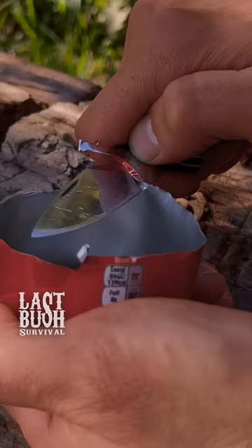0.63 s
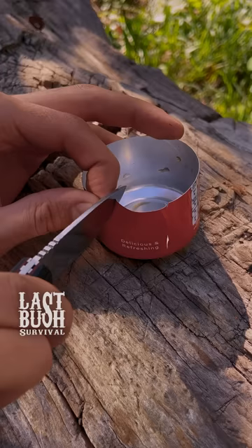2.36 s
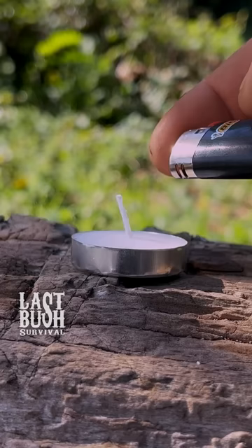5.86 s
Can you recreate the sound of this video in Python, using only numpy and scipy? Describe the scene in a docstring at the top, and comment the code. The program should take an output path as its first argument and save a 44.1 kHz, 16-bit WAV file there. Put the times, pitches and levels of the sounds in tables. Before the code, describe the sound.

A knife saws through a thin aluminium can in short, crackly scrapes and sharp snaps, then the metal knocks twice on wood.

```python
"""A knife cuts round a thin aluminium can on a log outdoors, close to a stereo microphone.
The blade sticks and slips through the wall in short strokes, and the buckling sheet snaps.
At the end the blade clinks free, the cut cup knocks twice on the wood and something slides over it.
Five short scenes, each with its own wind, far rumble and hiss; a faint low tick leads into the last."""
import sys
import numpy as np
from scipy import signal
from scipy.fft import rfft, irfft
from scipy.io import wavfile
from scipy.ndimage import uniform_filter1d

SR = 44100
rng = np.random.default_rng(int(sys.argv[2]) if len(sys.argv) > 2 else 0)


def generate_wav(sig):
    """Save sig (samples, or channels by samples) to the path in sys.argv[1] as 16-bit PCM at SR."""
    pcm = np.round(np.clip(np.atleast_2d(sig).T, -1, 1) * 32767).astype(np.int16)
    wavfile.write(sys.argv[1], SR, pcm)


N = 269892
SIZE = 4096  # samples in one response of the metal
HZ = np.fft.rfftfreq(SIZE, 1 / SR)
# bounds of the five scenes: (time [s])
SCENES = [0, .678, 2.435, 5.145, 5.91, 6.2]
# modes of the cup's base: (frequency [Hz], level [dB], t60 [s])
CUP_MODES = [(212, -32.5, 0.17), (681, -19, 0.063), (1369, -21.5, 0.15), (1530, -19, 0.14),
             (3670, -21, 0.027)]


def cutting():
    """Stick and slip: the edge bites, then uneven slips and a fine rub swell to each stroke's crest."""
    # let go by the blade, the can rings on: (frequency [Hz], level over the stroke [dB], t60 [s])
    after_ring = [(2680, -18, 0.14), (4360, -26, .09)]
    # slow judder in stiff wall, a fine run where the blade cuts freely: (time [s], slip rate [1/s])
    slip_rates = [(.4, 860), (.7, 300), (1.17, 137), (1.85, 100), (2.02, 513), (2.21, 176), (2.45, 1100),
                  (3.6, 890), (4.07, 250)]
    out = np.zeros((2, N))
    for start, length, rise, db, bright in strokes():
        crest, end = start + rise * length, start + length
        t = np.arange(start, end, 1 / SR)
        rub = friction(len(t), rate=np.interp(start, *np.transpose(slip_rates)))
        push = gain_of(-12 * np.interp(t, [start, crest, end], [1, 0, 1]) ** 1.5)
        bite = 0.5 * np.exp((start - t) / 0.0023 + (start - crest) / 0.043)  # quick strokes bite hardest
        knots = np.arange(start, end, .004)
        catch = gain_of(1.5 * np.interp(t, knots, rng.standard_normal(len(knots))))
        drive = unit_rms((push + bite) * catch * rub) * np.sqrt(np.mean(push ** 2))
        response = wall(start, bright, tail_db=-4, t60=0.019)
        add(out, start, gain_of(db) * signal.fftconvolve(response, drive[None], axes=1))
        if start > SCENES[2]:
            add(out, end, gain_of(db) * ring(after_ring))
    return out


def strokes():
    """The blade's moves: (start [s], length [s], share spent rising, level [dB], tilt [dB/octave])."""
    # the hand leans in until the metal gives: (start [s], length [s], level [dB], tilt [dB/octave])
    pushes = [(.048, 0.032, -37.5, -1.5), (0.997, 0.067, -48, -0.5), (1.3, .07, -55, .5),
              (1.437, 0.081, -47.5, 6.5), (1.85, 0.12, -52, 0.5), (2.024, 0.065, -42, 2),
              (2.21, 0.19, -47.5, 1), (2.439, 0.11, -42.5, -2), (2.536, 0.13, -42.5, -2),
              (2.82, 0.11, -36, 0), (3.199, 0.058, -43.5, -2.5), (3.306, 0.081, -45, -2.5),
              (3.466, 0.055, -43.5, -4), (3.591, 0.084, -35, 0), (3.978, 0.072, -52.5, -2),
              (4.068, 0.068, -47, -1.5), (4.509, 0.099, -51, -3), (4.695, 0.035, -49, -1)]
    # the edge rips, then may coast on: (start [s], rip [s], coast [s], level [dB], tilt [dB/octave])
    rips = [(.207, 0.011, 0, -32.5, -.5), (.258, .04, 0, -40, 0.5), (.484, .03, 0.0049, -45.5, -5),
            (.695, 0.058, 0.15, -46, -.5), (1.167, 0.077, 0.0023, -47, 0), (1.598, .022, 0.069, -35.5, 2.5),
            (2.93, 0.016, 0.076, -37, -1), (3.864, .048, 0.059, -35, -2), (4.355, 0.056, 0, -43, 0),
            (4.943, 0.023, 0.039, -41, -7.5)]
    push_rise, rip_rise, coast_rise, coast_db = .63, .25, .3, -52
    moves = [(start, length, push_rise, db, bright) for start, length, db, bright in pushes]
    for start, length, coast, db, bright in rips:
        moves.append((start, length, rip_rise, db, bright))
        if coast > 0:
            moves.append((start + length, coast, coast_rise, coast_db, 0))
    return moves


def friction(size, rate):
    """Force at the edge: uneven slips, about `rate` a second, each in a skid of noise, over a fine rub."""
    waits = rng.gamma(2, 1 / 2, 600)
    kicks = gain_of(3 * np.clip(rng.standard_normal(len(waits)), -2, 2))
    kicks *= rng.choice([-1, 1], len(waits))
    at = ((np.cumsum(waits) - waits[0]) * SR / rate).astype(int)
    slips = np.zeros(size)
    slips[at[at < size]] = kicks[at < size]
    skid_shape = signal.windows.hann(round(.8 * SR / rate)) ** 2  # slow slips skid longer
    skid = signal.fftconvolve(abs(slips), skid_shape, "same") * rng.standard_normal(size)
    return .6 * unit_rms(slips) + unit_rms(skid) + 0.27 * rng.standard_normal(size)


def wall(s, bright, tail_db, t60, bass_db=0):
    """The can's answer to one slip at time s; its resonances shift with the grip and the cut's length."""
    # the wall pierced by the point, sawn, and with its rim cut loose: (frequency [Hz], level [dB])
    pierced = [(300, -44), (1200, -17), (4200, -11), (6000, -4.5), (7600, 3), (9500, -0.5), (11000, 1.5),
               (15000, -12)]
    sawn = [(800, -13), (1200, -19.5), (1950, -5), (2700, 4), (3600, -13), (5400, -22), (7000, -16),
            (8100, -24), (11300, -14), (14500, -15), (16000, -21)]
    loose = [(60, -36), (300, -16.5), (1100, -17), (1650, -7.5), (1950, -15), (2700, -.5), (3350, 1.5),
             (3950, -10.5), (5450, -12), (6100, -19), (6950, -7.5), (8200, -16), (9800, -18.5),
             (10700, -11.5), (12300, -13), (13700, -4.5), (16000, -17.5)]
    # late in the cut the wall goes slack and its resonances blur: (time [s], slack [0-1])
    slackness = [(3.7, 0), (4.35, .6), (4.85, .05)]
    # the freed strip flaps with a resonance of its own: (time [s], boost [dB])
    flap = [(3.7, 1.5), (4.35, 9), (4.85, -0.5), (4.95, 12)]
    # the cut rim sings under the blade: (frequency [Hz], level [dB], t60 [s])
    rim_modes = [(3317, -26.5, 0.04), (3690, -31, 0.065), (6820, -30, 0.043)]
    stiffness = 1 + .02 * rng.uniform(-1, 1)  # the grip detunes the resonances
    colour = read_curve(pierced if s < SCENES[1] else sawn if s < SCENES[2] else loose, HZ / stiffness)
    slack = np.interp(s, *np.transpose(slackness))
    colour = (1 - slack) * colour + slack * uniform_filter1d(colour, size=200)
    ripple = uniform_filter1d(rng.standard_normal(len(HZ)), 36)
    grip_db = 1.7 * unit_rms(uniform_filter1d(ripple, 24))
    tilt_db = bright * np.log2(np.maximum(HZ, 1500) / 4000)
    shelf_db = bass_db / (1 + (HZ / 1300) ** 6)
    flap_db = np.interp(s, *np.transpose(flap)) * np.exp(-((HZ - 1950) / 300) ** 2)
    pulse = bending_wave(colour + grip_db + tilt_db + shelf_db + flap_db, lag_s=.0007)
    if s > SCENES[2]:
        rim = ring([(hz * stiffness, db, decay) for hz, db, decay in rim_modes], size=SIZE)
        pulse = pulse + (1 - slack) * abs(pulse).max() * rim
    return shimmer(pulse, tail_db, t60, width=.6 if s < SCENES[2] else .2)


def bending_wave(colour_db, lag_s):
    """In thin sheet the treble outruns the bass, so a click becomes a tiny chirp."""
    slowness = np.sqrt(3000 / (HZ + 500))
    delay = lag_s * (slowness - slowness[-1])
    phase = 2 * np.pi * np.cumsum(delay) * HZ[1]
    chirp = irfft(rfft(click(colour_db)) * np.exp(-1j * phase))
    return chirp * (np.arange(SIZE) < SIZE / 2)


def shimmer(pulse, tail_db, t60, width):
    """Adds the crowd of short-lived modes of thin sheet, a little different left and right."""
    t = np.arange(SIZE) / SR
    mid, side = rng.standard_normal((2, SIZE)) * gain_of(-60 * t / t60) * (1 - np.exp(-t / 0.0009))
    tail = gain_of(tail_db) * (mid + width * side * np.array([[1], [-1]])) / np.linalg.norm(mid)
    tail[:, 0] = 1  # the direct pulse
    return signal.fftconvolve(tail, pulse[None], axes=1)[:, :SIZE]


def snaps():
    """The sheet creaks under strain, then gives at once; the bigger the buckle, the thinner its bass."""
    # the sheet buckles or tears: (time [s], relative level [dB])
    buckles = [(0.2001, -25.5), (0.3216, -21), (.474, -24.5), (0.4843, -23.5), (0.5256, -29), (1.1687, -37),
               (1.5962, -24.5), (1.6119, -21), (1.8765, -28), (1.891, -31), (1.925, -26.5), (2.0601, -28.5),
               (2.0771, -22), (2.174, -39), (2.359, -19.5), (2.4853, -27), (2.4977, -24), (2.524, -26.5),
               (2.705, -31.5), (2.742, -31), (2.765, -28.5), (2.8865, -15), (2.8897, -18.5), (2.9024, -16),
               (2.9084, -16.5), (2.928, -16), (3.074, -33), (3.3484, -27), (3.3934, -29), (3.4193, -29.5),
               (3.4802, -28), (3.5361, -31), (3.6702, -23), (4.0717, -29), (4.108, -28), (4.1298, -32),
               (4.1402, -20), (4.3555, -29), (4.383, -28), (4.7827, -27), (4.8032, -25), (4.8175, -27.5),
               (4.8403, -23.5), (4.8537, -10), (4.9426, -28.5), (4.957, -20)]
    out = np.zeros((2, N))
    for s, db in buckles:
        response = wall(s, bright=-.6, tail_db=-12, t60=0.026, bass_db=-.7 * (db + 30.5))
        add(out, s - SIZE / 8 / SR + 0.00074, gain_of(db + 10) * scuffed_blow(response))
    return out


def scuffed_blow(response):
    """A blow SIZE / 8 samples in, with a short scuff that builds up to it and dies after it."""
    t = np.arange(-SIZE // 8, SIZE // 8) / SR
    envelope = 0.25 * np.exp(-abs(t) / 0.00043) + 0.023 * np.exp(-abs(t) / 0.0032)
    force = envelope * rng.standard_normal(len(t)) + (t == 0)
    sound = signal.fftconvolve(response, force[None], axes=1)
    return sound / np.linalg.norm(sound[0])


def clinks():
    """The blade flicks off the edge and rings briefly with a tinny rattle."""
    # flicks of the blade: (time [s], relative level [dB])
    flicks = [(5.1023, -37.5), (5.1112, -35.5), (4.182, -55.5)]
    # the blade's modes: (frequency [Hz], level [dB], t60 [s])
    blade_modes = [(2710, -14.5, .11), (3740, -8, 0.068), (5943, -8, 0.036), (7100, -8, 0.066),
                   (8100, 4.5, 0.035), (11200, 2, 0.03), (13500, -1, .02)]
    out = np.zeros((2, N))
    for s, db in flicks:
        add(out, s, gain_of(db - 2.5) * ring(blade_modes, size=SIZE))
        add(out, s, gain_of(db + 5.5) * wall(s, bright=4, tail_db=15.5, t60=0.03))
    return out


def knocks_and_tick():
    """The cup knocks twice on the wood, rim cracking, base ringing; a low tick marks the scene change."""
    # two knocks, then the faint tick: (time [s], ring level [dB], crack level [dB])
    hits = [(5.326, -38, -24), (5.4122, -15.5, 1.5), (5.904, -40, -45)]
    # spectrum of the crack: (frequency [Hz], level [dB])
    crack_colour = [(400, -40.5), (1200, -11.5), (2200, -3), (3700, 2.5), (5000, -13), (7200, -8.5),
                    (8900, -2), (10900, 4), (12800, -18), (16000, -26)]
    out = np.zeros((2, N))
    for s, ring_db, crack_db in hits:
        crack = shimmer(click(read_curve(crack_colour, HZ)), tail_db=-4.5, t60=0.019, width=0.22)
        add(out, s - SIZE / 8 / SR, gain_of(crack_db) * scuffed_blow(crack))
        add(out, s, gain_of(ring_db) * ring(CUP_MODES))
    return out


def slide():
    """Something slides lightly over the metal: a fluttering friction hiss that swells and fades."""
    # spectrum of the friction: (frequency [Hz], level [dB])
    hiss_colour = [(4000, -16), (7000, -2.5), (10000, 3.5)]
    start_s, end_s, level_db = 5.57, 5.88, -58
    colour_db = read_curve(hiss_colour, np.fft.rfftfreq(N, 1 / SR))
    hiss = irfft(rfft(rng.standard_normal(N)) * gain_of(colour_db), N)
    flutter_db = 3.2 * wander(size=200)
    swell = np.sin(np.interp(np.arange(N) / SR, [start_s, end_s], [0, np.pi]))
    return unit_rms(hiss) * gain_of(level_db + flutter_db) * swell


def fingers():
    """Fingertips shift on the cut cup and faintly stir its base."""
    t = np.arange(N) / SR
    rub = signal.fftconvolve(rng.standard_normal(N), ring(CUP_MODES[2:4], size=250))[:N]
    level_db = -75 + 4 * wander(size=2500)
    return unit_rms(rub) * gain_of(level_db) * (t > SCENES[3])


def background():
    """Wind, far rumble and hiss: lumpy and nearly mono in the bass, steady and wider above."""
    # rumble and background hiss, one list a scene, the top treble rolled off in the fourth:
    # (frequency [Hz], relative level [dB])
    colours = [
        [(130, -58), (330, -9), (600, 2.5), (1300, -13.5), (4000, -26), (14000, -26)],
        [(35, -33), (110, 6), (190, -4.5), (450, -13), (1050, -32), (3300, -26), (6500, -42)],
        [(45, -30.5), (120, 2), (300, -10), (1500, -20.5), (4000, -25.5), (9000, -36.5)],
        [(30, -11), (72, 4), (300, -22), (2000, -24), (2900, -36), (11000, -37.5), (15000, -48)],
        [(30, -22), (75, 3), (350, -22.5), (1000, -29.5), (4500, -52)],
    ]
    # its strength, one row a scene: (start level [dB], end level [dB])
    scene_levels = [(-61, -62), (-55, -55.5), (-58, -66.5), (-63.5, -62.5), (-47, -47.5)]
    t, hz, out = np.arange(N) / SR, np.fft.rfftfreq(N, 1 / SR), np.zeros((2, N))
    mid, side = rfft(rng.standard_normal((2, N)))
    side = side * gain_of(read_curve([(50, -32), (250, -7)], hz))
    for start, end, colour, levels_db in zip(SCENES, SCENES[1:], colours, scene_levels):
        inside = (t >= start) & (t < end)
        noise = irfft(np.array([mid + side, mid - side]) * gain_of(read_curve(colour, hz)), N)
        level_db = np.interp(t[inside], [start, end], levels_db)
        out[:, inside] = unit_rms(noise[:, inside]) * gain_of(level_db)
    bass = signal.sosfiltfilt(signal.butter(2, 200, fs=SR, output="sos"), out)
    gust = gain_of(wander(size=3000))
    return out + bass * (gust - 1)


def microphone_ports(x, lag):
    """The microphone's two ports drift out of step in the treble, turning right against left."""
    turn = np.exp(-1j * read_curve(lag, np.fft.rfftfreq(N, 1 / SR)))
    return np.array([x[0], irfft(rfft(x[1]) * turn, N)])


def click(colour_db):
    """The sharpest causal pulse with this spectrum, of energy 1."""
    log_gain = np.log(gain_of(np.r_[colour_db, colour_db[-2:0:-1]]))
    pulse = np.fft.ifft(np.exp(np.conj(signal.hilbert(log_gain)))).real
    return pulse / np.linalg.norm(pulse)


def ring(modes, size=12000):
    """Dying sines, one a mode."""
    t = np.arange(size) / SR
    return sum(gain_of(db - 60 * t / t60) * np.sin(2 * np.pi * hz * t) for hz, db, t60 in modes)


def wander(size):
    """Random drift of rms 1, smoothed over `size` samples."""
    return unit_rms(uniform_filter1d(rng.standard_normal(N), size))


def gain_of(db):
    """Decibels to amplitude."""
    return 10 ** (np.asarray(db) / 20)


def unit_rms(x):
    """Scales to rms 1."""
    return x / np.sqrt(np.mean(x ** 2) + 1e-20)


def read_curve(points, hz):
    """Reads a table on a log-frequency axis."""
    f, value = np.transpose(points)
    return np.interp(np.log(hz + 1), np.log(f + 1), value)


def add(mix, s, sound):
    """Mixes a sound into both channels at time s."""
    part = mix[:, max(round(s * SR), 0):][:, :sound.shape[-1]]
    part += sound[..., :part.shape[1]]


def scene():
    """The can outdoors, close to the microphone and a touch to the left, from four angles in turn."""
    # phase between the ports, one list a scene with the can: (frequency [Hz], right lag [rad])
    port_lags = [
        [(3800, 0), (11000, 2.5)],
        [(2800, 0), (5800, 4)],
        [(9000, 0), (9700, -1.6), (10400, -6)],
        [(6500, 0), (12500, -3)],
    ]
    t = np.arange(N) / SR
    can = cutting() + snaps() + clinks() + knocks_and_tick() + slide() + fingers()
    heard = sum(microphone_ports(can * ((t >= start) & (t < end)), lag)
                for start, end, lag in zip(SCENES, SCENES[1:], port_lags))
    return heard * gain_of([[.25], [-.25]]) + background()


def record(dry):
    """The recorder's band limit."""
    low_pass = signal.firwin(255, 16100, window=("kaiser", 8), fs=SR)
    return signal.oaconvolve(dry, low_pass[None], "same")


dry = scene()
out = record(dry)
generate_wav(out)
```